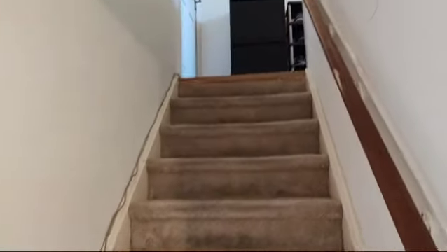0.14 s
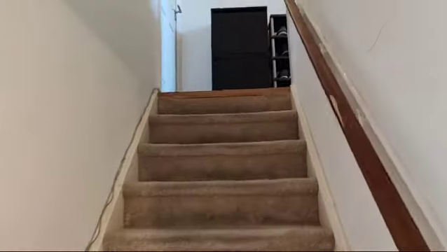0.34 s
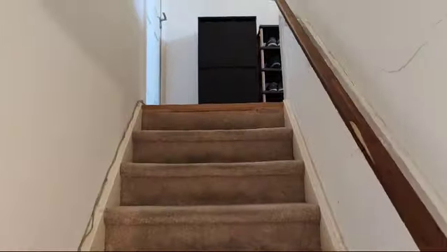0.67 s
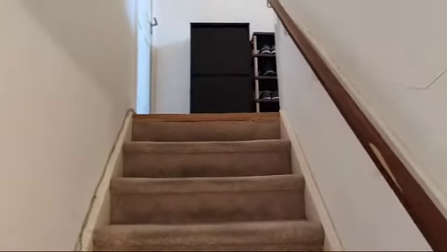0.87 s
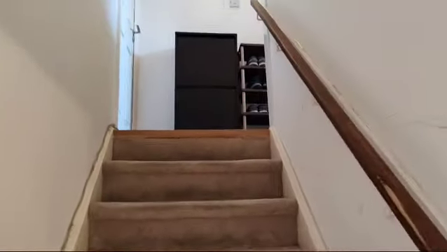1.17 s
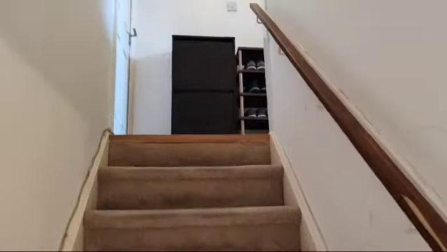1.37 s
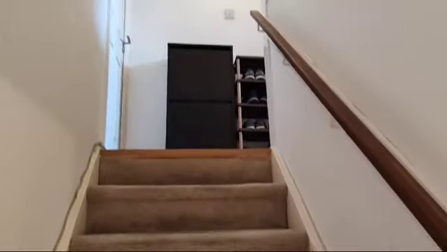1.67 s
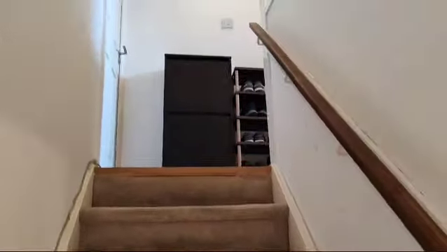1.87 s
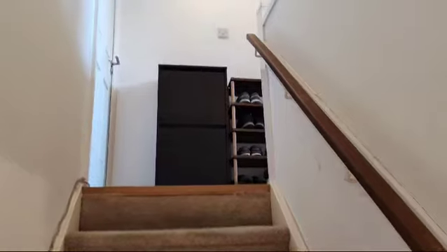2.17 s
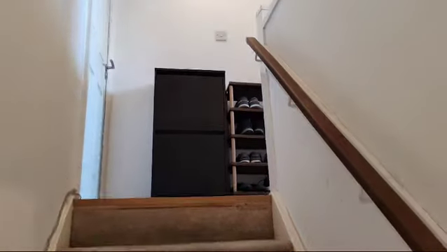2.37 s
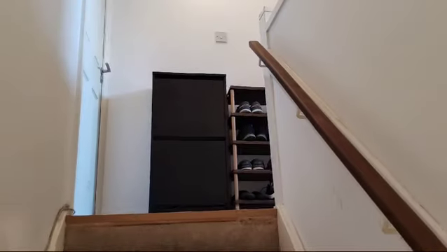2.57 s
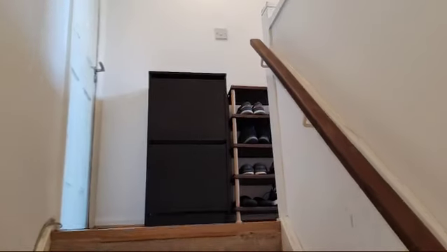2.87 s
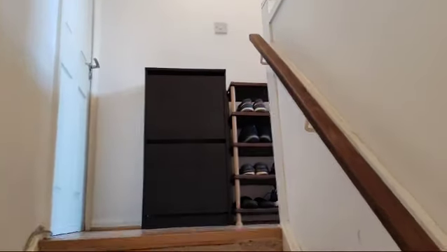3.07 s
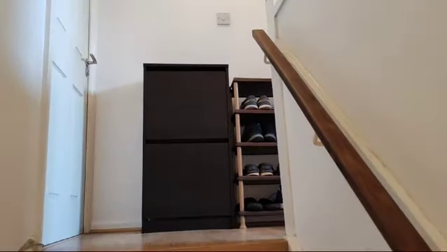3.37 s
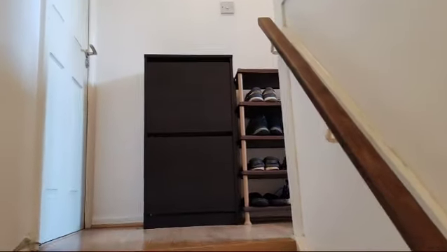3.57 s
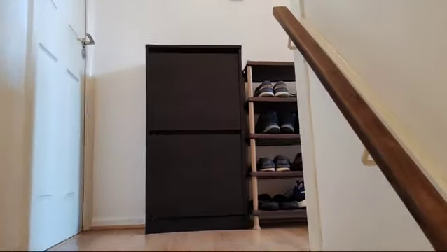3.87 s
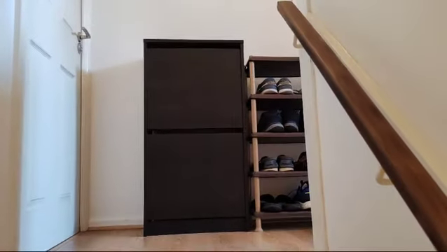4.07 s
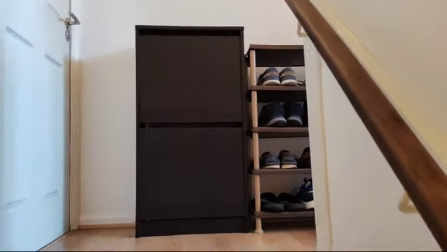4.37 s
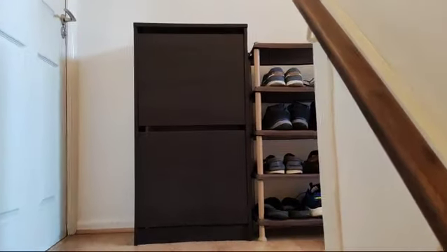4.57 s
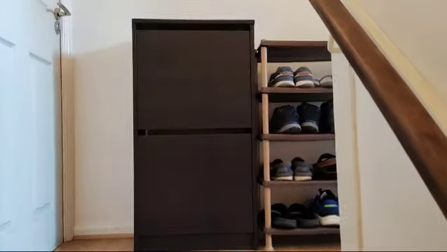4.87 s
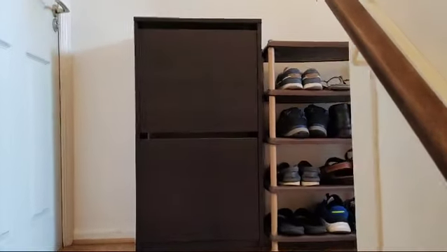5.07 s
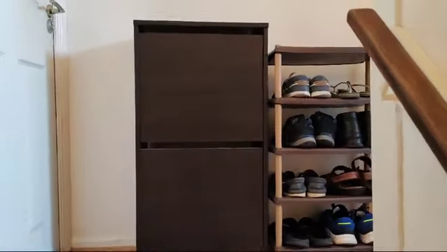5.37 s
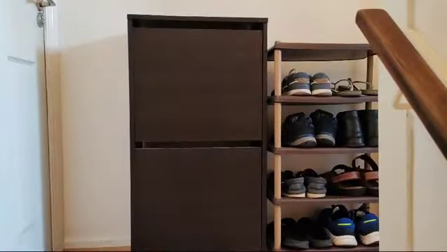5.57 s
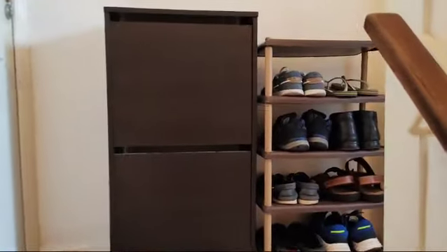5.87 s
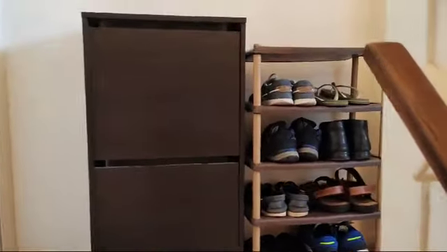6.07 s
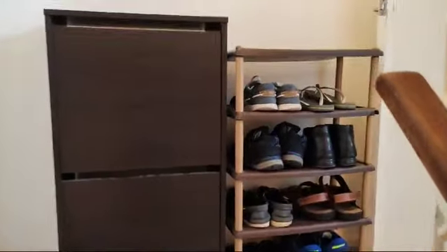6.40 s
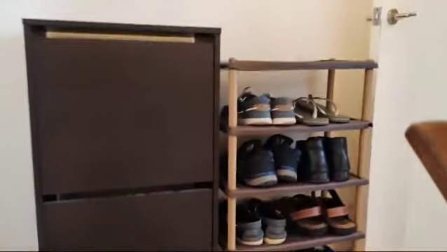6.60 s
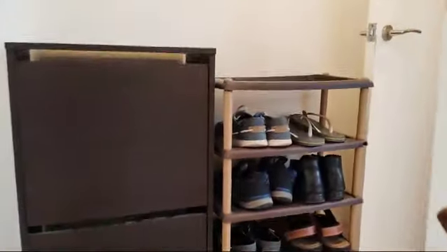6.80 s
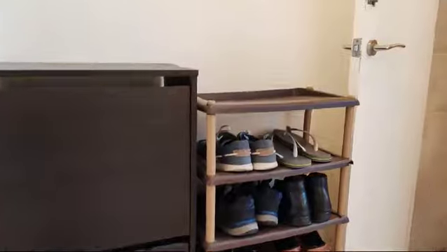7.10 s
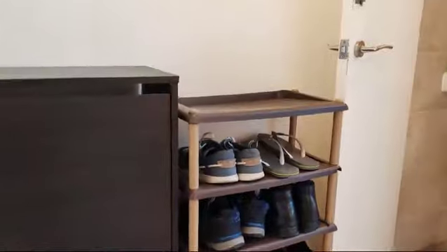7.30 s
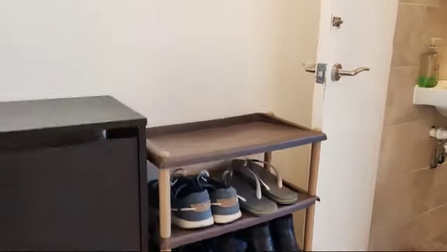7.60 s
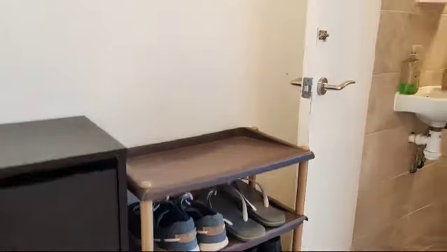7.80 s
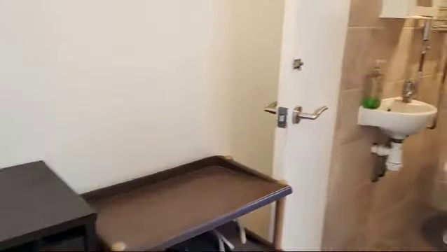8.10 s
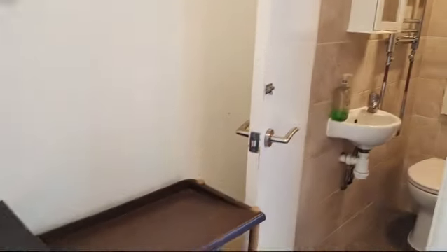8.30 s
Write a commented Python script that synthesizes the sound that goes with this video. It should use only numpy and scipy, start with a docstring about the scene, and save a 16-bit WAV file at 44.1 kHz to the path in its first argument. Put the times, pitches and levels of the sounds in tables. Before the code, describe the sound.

Indoors, in a small reverberant stairwell, someone climbs carpeted wooden stairs holding the microphone. A barely audible step at 0.2 s is followed by a firm thud at 1.0, with small cracks and a bump at 1.2. Dull toe-and-heel knocks with low, hollow booms continue at about 1.8, 2.5, 3.2, 3.9, 4.6, 5.2, 6.0, 6.8, 7.5 and 8.2 s. The 3.2 s step is much the loudest, a heavy thump with a short run of cracks and a creak. The clearest wooden snaps and raspy creaks come around 5.3-5.4 and 6.0-6.2, with smaller, higher ones near 7.0 and 7.6. Soft carpet and cloth brushes accompany the steps; tiny dry ticks appear near 0.4, 2.3, 2.6 and 8.3. Beneath lie quiet room air and a faint low hum, while wavering fan tones strengthen unevenly, notably around 5.7 and at the end.

```python
"""Footsteps climb a carpeted wooden staircase in a small house, microphone in hand.
Each contact is two knocks made of dense echoes; decaying sines boom under the body's weight.
Loaded boards crack and creak as slips that ring a resonance; soles and clothes brush as grainy noise.
Ticks sound close by, over room air and a faint hum; wavering fan tones come unevenly nearer at the top."""
import sys
import numpy as np
from scipy import signal
from scipy.fft import rfft, irfft, next_fast_len
from scipy.io import wavfile
from scipy.ndimage import uniform_filter1d

SR = 44100
rng = np.random.default_rng(int(sys.argv[2]) if len(sys.argv) > 2 else 0)


def digitize_waveform(pressure):
    """Quantize a signal to 16-bit integers and store it at the path in sys.argv[1].

    Rows of a 2-D input are taken as channels; values are limited to [-1, 1].
    """
    field = np.atleast_2d(pressure).T
    bounded = np.clip(field, -1, 1)
    quanta = np.round(bounded * 32767).astype(np.int16)
    wavfile.write(sys.argv[1], SR, quanta)


N = 372644
TIME = np.arange(N) / SR
# every single sound is rendered into a buffer of this many samples; AGE is its time in seconds
RING_SIZE = 24000
AGE = np.arange(RING_SIZE) / SR

# Event levels are relative; knocks, cracks and creaks each add a trim_db.
# Tilts are brightness around 1 kHz; colours are relative spectra, scaled to unit power.

# a foot meets a tread: mostly landings, and at 1.227 s a bump or push-off between steps:
# start_s, toe_db, heel_delay_s, heel_db, tilt_db_per_octave, panel_pitch_hz,
# weight_delay_s, weight_db, tread_db, tread_pitch_hz, sole_brush_db
FOOT_CONTACTS = [(0.219, -34, 0.027, -33.5, -7.5, 220, 0.027, -73, -43, 159.7, -69),
                 (0.996, -26, 0.03, -21.5, 0.5, 247, 0.0089, -35.5, -23, 131.3, -47.5),
                 (1.227, -29, 0.034, -32, -2.5, 248, 0.0034, -44.5, -30.5, 180, -77),
                 (1.777, -34.5, 0.032, -24.5, 1, 183, 0.0142, -23.5, -31, 131.2, -48.5),
                 (2.505, -34.5, 0.14, -41.5, -0.5, 204, 0.0029, -41, -42, 114, -51.5),
                 (3.204, -12, 0.028, -18.5, -2, 320, 0.022, -21, -20.5, 107.8, -45),
                 (3.894, -29.5, 0.039, -35, -2, 174, 0.0052, -39.5, -42, 112, -52),
                 (4.551, -22.5, 0.12, -28, 0.5, 228, 0.017, -22, -40, 118, -41.5),
                 (5.21, -28, 0.04, -33, 0, 184, 0.0025, -37, -36, 181.6, -49.5),
                 (5.954, -33.5, 0.014, -28.5, 2, 191, 0.017, -33, -31, 109.6, -45.5),
                 (6.75, -19, 0.027, -17.5, -2, 309, 0.03, -28, -28, 110.4, -45.5),
                 (7.478, -20, 0.034, -20.5, 0.5, 332, 0.0025, -32.5, -31, 141.6, -40),
                 (8.151, -28.5, 0.017, -15, -0.5, 283, 0.032, -22, -33, 142, -39.5)]
# stereo spread: frequency_hz, side_minus_mid_db
STEREO_WIDTH = [(60, -14), (125, -19), (250, -8.5), (500, -8.5), (1000, 0.5), (3000, -0.5)]
# stereo shading of the steps and boards: frequency_hz, left_minus_right_db
STAIR_BALANCE = [(60, -3.5), (120, 1.5), (250, -1), (520, 0.5), (1060, -2), (2170, -8.5), (4440, -3.5),
                 (9100, 4)]
# stereo shading of the room air and ticks: frequency_hz, left_minus_right_db
ROOM_BALANCE = [(60, 3), (160, 0.5), (450, 0), (1220, -4.5), (3330, -3.5), (9100, 3.5)]


def knocks(squash_s=0.0016, trim_db=-5.5):
    """The carpet squashes first and softens each foot contact to a dull wooden knock."""
    # knock spectrum: frequency_hz, level_db_per_hz
    knock_colour = [(50, -26), (110, -2), (170, 1), (320, -1), (450, -6), (700, -13), (1200, -25),
                    (2500, -29.5), (8000, -39), (14000, -78.5)]
    out = np.zeros((2, N))
    for start_s, level_db, tilt_db, panel_hz in contacts():
        onset = 1 - np.exp(-AGE / squash_s)
        room = stairwell(direct_db=-13.5, early_s=0.01, tail_db=6.5) * onset
        thud = coloured(room, knock_colour, STAIR_BALANCE, tilt_db)
        knock = ringing(thud, panel_hz, q=22.5, ring_db=4.0)
        add(out, start_s, from_db(level_db + trim_db) * knock)
    return out


def contacts():
    """Toe, then heel, of every foot contact: start_s, level_db, tilt_db_per_octave, panel_pitch_hz."""
    for start_s, toe_db, heel_delay_s, heel_db, tilt_db, panel_hz, *_ in FOOT_CONTACTS:
        yield start_s, toe_db, tilt_db, panel_hz
        yield start_s + heel_delay_s, heel_db, tilt_db, panel_hz


def booms(flight_hz=49.36, joist_hz=84.7):
    """Body weight bends the whole flight, its joists and the tread underfoot: three damped sines."""
    out = np.zeros((2, N))
    for start_s, flight_db, joist_db, tread_db, tread_hz in loads():
        flight = from_db(flight_db + 8.0) * mode(flight_hz, t60=0.63, rise_s=0.015)
        joists = from_db(joist_db + 6.0) * mode(joist_hz, t60=0.45, rise_s=0.0019)
        tread = from_db(tread_db + 8.0) * mode(tread_hz, t60=0.27, rise_s=0.007)
        # the joists swing against the flight and the tread
        add(out, start_s, flight - joists + tread)
    return out * from_db([[.45], [-.45]])   # slightly left


def loads(joist_share=0.66, joist_offset_db=0.5, rebound_s=0.052, rebound_db=-7.5):
    """Weight follows the toe, then sinks once more: start_s, flight_db, joist_db, tread_db, tread_pitch_hz."""
    for start_s, *_, weight_delay_s, weight_db, tread_db, tread_hz, _ in FOOT_CONTACTS:
        # the joists move partly with the whole flight, partly with the tread
        joist_db = joist_offset_db + joist_share * weight_db + (1 - joist_share) * tread_db
        for lag_s, change_db in ((0, 0), (rebound_s, rebound_db)):
            when_s = start_s + weight_delay_s + lag_s
            yield when_s, weight_db + change_db, joist_db + change_db, tread_db + change_db, tread_hz


def mode(hz, t60, rise_s):
    """A resonance that swells as the foot presses down, then dies away (t60 in seconds)."""
    decay = from_db(-60 * AGE / t60)
    return np.sin(2 * np.pi * hz * AGE) * decay * (1 - np.exp(-AGE / rise_s))


def cracks(trim_db=-6.5):
    """Single sharp slips of a loaded board, and clacks of a tread against its riser."""
    out = np.zeros((2, N))
    for start_s, level_db, tilt_db, board_hz in snaps():
        room = stairwell(direct_db=-5.0, early_s=0.0036, tail_db=5.5)
        crack = board(room, board_hz, tilt_db, ring_db=-0.5)
        add(out, start_s, from_db(level_db + trim_db) * crack)
    return out


def snaps(loose_db=-22, clack_db=-26, clack_share=0.2, clack_tilt_db=1.0, clack_hz=1500, gap_s=0.027):
    """Clacks of heavy steps, then runs of cracks: start_s, level_db, tilt_db_per_octave, board_pitch_hz."""
    # a board snaps against its nails, once or in a run:
    # start_s, snap_count, level_db, tilt_db_per_octave, board_pitch_hz
    crack_runs = [(1.104, 1, -23, 1, 318), (1.115, 1, -20, -6.5, 770), (1.227, 1, -22, -1.5, 255),
                  (1.921, 1, -24.5, -4.5, 187), (3.296, 4, -27, 0.5, 452), (5.313, 1, -25, 4.5, 405),
                  (5.379, 2, -24, 4, 360), (5.434, 1, -18, 3, 280), (5.954, 1, -27, 1, 1510),
                  (6.040, 1, -23, 5, 630), (6.943, 1, -24.5, -1, 1435), (6.979, 2, -26.5, 1, 1470),
                  (7.632, 2, -28.5, -1.5, 1320)]
    for start_s, toe_db, heel_delay_s, heel_db, *_ in FOOT_CONTACTS:
        hardest_db, when_s = max((toe_db, start_s), (heel_db, start_s + heel_delay_s))
        # only a knock harder than loose_db clacks; the clack takes a share of the extra force
        if hardest_db > loose_db:
            level_db = clack_db + clack_share * (hardest_db - loose_db)
            yield when_s, level_db, clack_tilt_db, clack_hz
    for start_s, count, level_db, tilt_db, board_hz in crack_runs:
        for k in range(round(count)):
            yield start_s + k * gap_s, level_db, tilt_db, board_hz


def creaks(slips_per_s=140, jitter=.2, uneven_db=1.5, first_db=-1.5, last_db=-9.0,
           rasp_db=-2.5, rasp_s=0.0019, lowest_hz=180, trim_db=-4.0):
    """Runs of uneven slips, each with a brief rasp, ring the same board and swell and ease with the load."""
    # a joint sticks and slips: start_s, swell_s, ease_s, level_db, tilt_db_per_octave, board_pitch_hz
    creak_runs = [(1.866, 0.041, 0.095, -41.5, -0.5, 2180), (3.29, 0.042, 0.058, -35, 0, 430),
                  (4.009, 0.045, 0.055, -33, 0, 617), (4.679, 0.022, 0.052, -47.5, 3.5, 414),
                  (5.32, 0.037, 0.12, -26.5, 1, 300), (6.05, 0.063, 0.008, -34.5, -1, 720),
                  (6.122, 0.044, 0.036, -25.5, 0, 366), (6.951, 0.068, 0.026, -49.5, 4.5, 1420),
                  (7.626, 0.043, 0.031, -29, -2.5, 1450)]
    out = np.zeros((2, N))
    for start_s, swell_s, ease_s, level_db, tilt_db, board_hz in creak_runs:
        gap, strength = rng.standard_normal((2, 60))
        gaps_s = np.exp(jitter * gap) / slips_per_s
        when_s = np.cumsum(gaps_s) - gaps_s[0]
        length_s = swell_s + ease_s
        load_db = np.interp(when_s, [0, swell_s, length_s], [first_db, 0, last_db])
        force = from_db(load_db + uneven_db * strength) * (when_s < length_s)
        slips = np.bincount((when_s * SR).astype(int), force, RING_SIZE)[:RING_SIZE]
        # each slip leaves a decaying burst of noise: the rasp
        keep = np.exp(-2 / (rasp_s * SR))
        sliding = np.sqrt(signal.lfilter([1 - keep], [1, -keep], slips ** 2 + 1e-18))
        friction = slips + from_db(rasp_db) * sliding * rng.standard_normal(RING_SIZE)
        # the smaller and higher the board, the less bass it radiates
        edge_hz = lowest_hz * np.sqrt(board_hz / 400)
        bass_cut = signal.butter(2, edge_hz, "high", fs=SR, output="sos")
        friction = signal.sosfilt(bass_cut, friction)
        room = stairwell(direct_db=-2.5, early_s=0.0057, tail_db=3.5)
        slip = board(room, board_hz, tilt_db, ring_db=-1.0)
        creak = signal.fftconvolve(slip, friction[None], axes=1)
        add(out, start_s, from_db(level_db + trim_db) * creak)
    return out


def board(room, board_hz, tilt_db, ring_db):
    """One slip of a board as the room carries it, with the board's main mode ringing out."""
    # wooden board spectrum: frequency_hz, level_db_per_hz
    board_colour = [(71, -35), (120, -4.5), (259, -5), (305, -6), (347, -6), (417, -1), (457, -7),
                    (624, -10), (1060, -12), (1710, -21), (2550, -24.5), (4430, -36), (5310, -42),
                    (6870, -43.5), (9550, -59.5), (12400, -86.5), (21000, -120)]
    slip = coloured(room, board_colour, STAIR_BALANCE, tilt_db)
    return ringing(slip, board_hz, q=4.0, ring_db=ring_db)


def ringing(x, hz, q, ring_db):
    """The struck board's own resonance stands out of the sound; the power stays the same."""
    ring = signal.lfilter(*signal.iirpeak(hz, q, fs=SR), x)
    return rms_one(x + from_db(ring_db) * ring) * x.std()


def brushes(grain_db=3.0, peak_s=.2):
    """Fibres catch and let go under a sliding sole: a grainy hiss that swells and fades."""
    # carpet and cloth spectrum: frequency_hz, level_db_per_hz
    brush_colour = [(150, -6), (600, -2.5), (1500, 1), (2500, -3.5), (4500, -1.5), (7000, -5.5),
                    (9000, -18.5), (12000, -29.5)]
    out = np.zeros((2, N))
    from_peak = AGE - peak_s
    for loudest_s, level_db, swell_s, fade_s, tilt_db in strokes():
        swell = -(from_peak / swell_s) ** 2
        fade = -np.abs(from_peak / fade_s) ** 0.9
        stroke = np.exp(np.where(from_peak < 0, swell, fade))
        # noise smoothed over about 2 ms roughens the level
        roughness = rms_one(uniform_filter1d(rng.standard_normal(RING_SIZE), size=90))
        grain = from_db(grain_db * roughness)
        hiss = coloured(rms_one(diffuse(RING_SIZE) * grain), brush_colour, STAIR_BALANCE, tilt_db)
        add(out, loudest_s - peak_s, from_db(level_db) * stroke * hiss)
    return out


def strokes():
    """Three brushes a contact, then stray scuffs: loudest_s, level_db, swell_s, fade_s, tilt_db_per_octave."""
    # a sole drags over the carpet: loudest_s, level_db, fade_s, tilt_db_per_octave
    stray_scuffs = [(0.34, -52.5, 0.088, 6.5), (1.239, -46.5, 0.017, 0.5), (1.688, -57.5, 0.05, 4.5),
                    (1.856, -43.5, 0.015, 2), (1.89, -40.5, 0.028, -3.5), (2.489, -46, 0.057, -6.5),
                    (2.581, -51, 0.06, -3.5), (2.78, -47.5, 0.071, -5), (4.165, -44, 0.031, -6),
                    (5.269, -50, 0.04, -6), (7.041, -43, 0.038, -4)]
    for start_s, *_, brush_db in FOOT_CONTACTS:
        # the trouser leg swings, the sole slides in, the sole pushes off
        yield start_s - 0.09, -58, 0.095, 0.077, -6.5
        yield start_s + 0.028, brush_db, 0.027, 0.073, -3
        yield start_s + 0.26, -60.5, 0.061, 0.04, -5.5
    for loudest_s, level_db, fade_s, tilt_db in stray_scuffs:
        yield loudest_s, level_db, 0.02, fade_s, tilt_db


def ticks(decay_s=0.00063):
    """Tiny dry ticks right at the microphone: noise that dies within milliseconds."""
    # ticks: start_s, peak_db
    tick_events = [(0.2364, -48), (0.4406, -37), (2.1408, -48.5), (2.295, -39), (2.6462, -42),
                   (8.2745, -41)]
    # tick spectrum: frequency_hz, level_db_per_hz
    tick_colour = [(500, -28), (3000, -22), (5500, 12), (8000, 11), (14000, -18)]
    out = np.zeros((2, N))
    for start_s, peak_db in tick_events:
        burst = diffuse(RING_SIZE) * np.exp(-AGE / decay_s)
        tick = coloured(burst, tick_colour, ROOM_BALANCE)
        add(out, start_s, from_db(peak_db) * tick / np.abs(tick).max())
    return out


def house():
    """Room air as shaped noise, a low hum and the tones of a fan beyond the landing."""
    # background levels over time: time_s, room_air_db, fan_db
    level_points = [(0, -51, -62), (1.499, -53.5, -62), (3.0, -51.5, -57), (4.499, -52, -59),
                    (5.7, -49, -51.5), (7.0, -51, -58), (8.45, -47, -47.5)]
    # room air spectrum: frequency_hz, level_db_per_hz
    air_colour = [(15, -42), (25, -2.5), (96, -1), (197, -8), (266, -14.5), (301, -4), (332, -15),
                  (533, -14), (667, -13), (737, -15), (1180, -15), (1670, -25.5), (1900, -21),
                  (4420, -33.5), (9550, -53.5), (12400, -95.5), (21000, -120)]
    # hum tones: pitch_hz, level_db
    hum_lines = [(97, -60.5), (194, -68.5)]
    # fan tones: pitch_hz, level_db (relative to the fan level)
    fan_lines = [(302, -10.5), (430, -13.5), (663, -8), (1001, -14.5)]
    time_s, air_db, fan_db = np.transpose(level_points)
    air_gain = from_db(np.interp(TIME, time_s, air_db))
    fan_gain = from_db(np.interp(TIME, time_s, fan_db))
    rush = coloured(diffuse(next_fast_len(N))[:, :N], air_colour, ROOM_BALANCE)
    hum = tones(hum_lines, waver=0.23, knots_per_s=22)
    fan = tones(fan_lines, waver=0.58, knots_per_s=7)
    return air_gain * rush + hum + fan_gain * fan


def tones(lines, waver, knots_per_s):
    """Steady tones that waver as the microphone moves through their standing waves."""
    out = 0
    knots_s = np.arange(200) / knots_per_s
    for hz, level_db in lines:
        # complex random swings change both level and phase
        shared, own = rng.standard_normal((2, len(knots_s), 2)) @ [1, 1j]
        apart = from_db(at_hz(STEREO_WIDTH, hz)) * own
        swing = np.array([np.interp(TIME, knots_s, 1 + waver * (shared + sign * apart))
                          for sign in (1, -1)])
        tone = np.real(swing * np.exp(2j * np.pi * hz * TIME))
        out = out + from_db(level_db) * rms_one(tone)
    return out


def stairwell(direct_db, early_s, tail_db):
    """Response on the stairs: direct sound, a quick flurry off near walls, a tail decaying band by band."""
    # stairwell decay: frequency_hz, t60_s
    decay_bands = [(100, 0.45), (400, 0.31), (1000, 0.35), (2800, 0.3), (7500, 0.3)]
    field = rfft(diffuse(RING_SIZE))
    hz = np.fft.rfftfreq(RING_SIZE, 1 / SR)
    centres_hz, t60s = np.transpose(decay_bands)
    tail = 0
    for share, t60 in zip(np.eye(len(centres_hz)), t60s):
        band = irfft(field * at_hz(np.c_[centres_hz, share], hz))
        tail = tail + band * from_db(-60 * AGE / t60)
    early = diffuse(RING_SIZE) * np.exp(-AGE / early_s)
    direct = 1. * (AGE == 0)
    echoes = rms_one(early) + from_db(tail_db) * rms_one(tail) + from_db(direct_db) * rms_one(direct)
    # as much energy as 20 ms at an rms of 1
    return rms_one(echoes) * np.sqrt(.02 / AGE[-1])


def diffuse(size):
    """White noise from all around: alike in both channels in the bass, unrelated in the treble."""
    mid, side = rfft(rng.standard_normal((2, size)))
    width = from_db(at_hz(STEREO_WIDTH, np.fft.rfftfreq(size, 1 / SR)))
    return irfft((mid + width * side * [[1], [-1]]) / np.sqrt(1 + width ** 2), size)


def coloured(x, colour, balance, tilt_db=0):
    """Causal (minimum-phase) filter of unit power, with its own shading for each side."""
    size = 2 * next_fast_len(x.shape[-1] // 2 + 1)
    hz = np.fft.rfftfreq(size, 1 / SR)
    octaves = np.log2(np.maximum(hz, 100) / 1000)
    shading_db = at_hz(balance, hz) * [[.5], [-.5]]
    gain = rms_one(from_db(at_hz(colour, hz) + tilt_db * octaves + shading_db))
    # folding the cepstrum onto positive times gives the minimum phase
    cepstrum = irfft(np.log(gain))
    cepstrum[:, 1:size // 2] *= 2
    cepstrum[:, size // 2 + 1:] = 0
    return irfft(rfft(x, size) * np.exp(rfft(cepstrum)))[:, :x.shape[-1]]


def from_db(db):
    """Decibels to gain."""
    return 10 ** (np.asarray(db) / 20)


def rms_one(x):
    """Scale to an rms of 1."""
    return x / np.sqrt(np.mean(x ** 2) + 1e-20)


def at_hz(points, hz):
    """Read a table on a log-frequency axis."""
    known_hz, values = np.transpose(points)
    return np.interp(np.log(np.maximum(hz, 1)), np.log(known_hz), values)


def add(out, start_s, sound):
    """Mix a sound in at start_s, or at zero if that is negative."""
    start = max(round(start_s * SR), 0)
    out[:, start:start + sound.shape[-1]] += sound[..., :N - start]


def scene():
    """Steps on the stairs over the quiet of the house."""
    return knocks() + booms() + cracks() + creaks() + brushes() + ticks() + house()


def record(dry, top_db=-8.5, hiss_db=-88.5, shelf_hz=9600, cutoff_hz=15700):
    """The microphone's treble drops by a steep shelf onto its own faint hiss; the very top is cut."""
    below = signal.sosfiltfilt(signal.butter(10, shelf_hz, fs=SR, output="sos"), dry)
    shelved = below + from_db(top_db) * (dry - below)
    hiss = from_db(hiss_db) * rng.standard_normal(dry.shape)
    top_cut = signal.ellip(10, .1, 80, cutoff_hz, fs=SR, output="sos")
    return signal.sosfilt(top_cut, shelved + hiss)


dry = scene()
out = record(dry)
digitize_waveform(out)
```